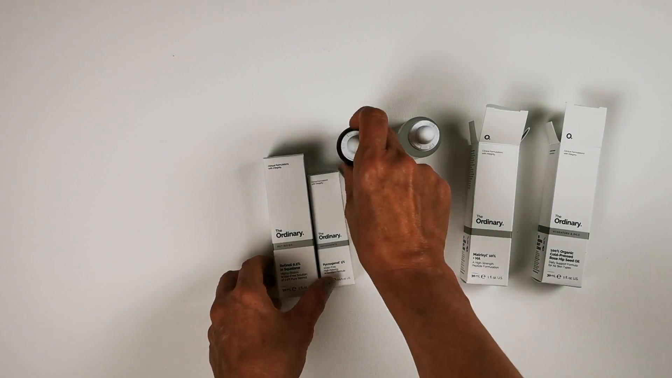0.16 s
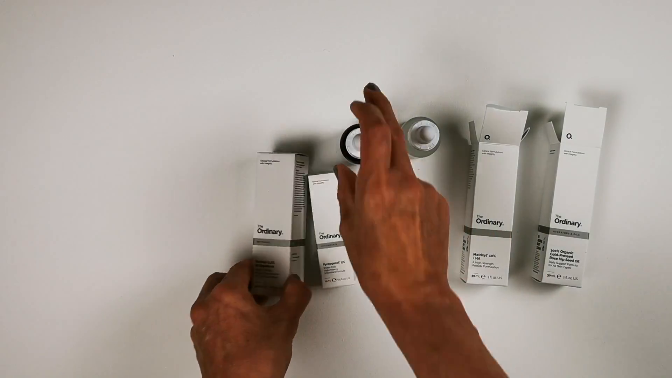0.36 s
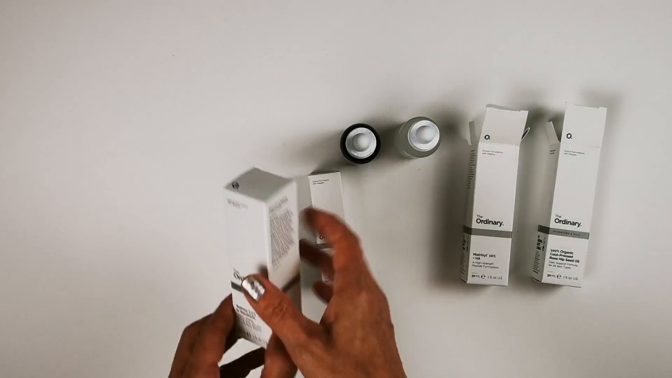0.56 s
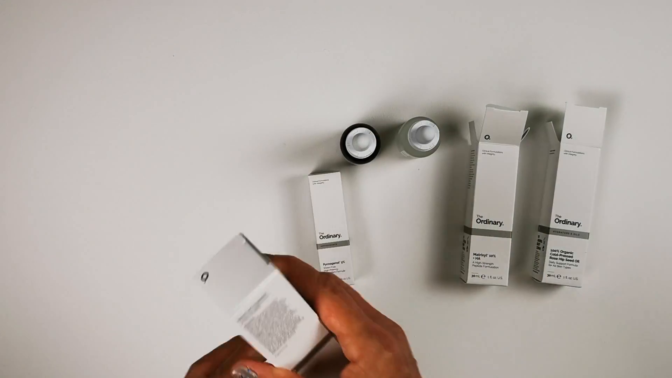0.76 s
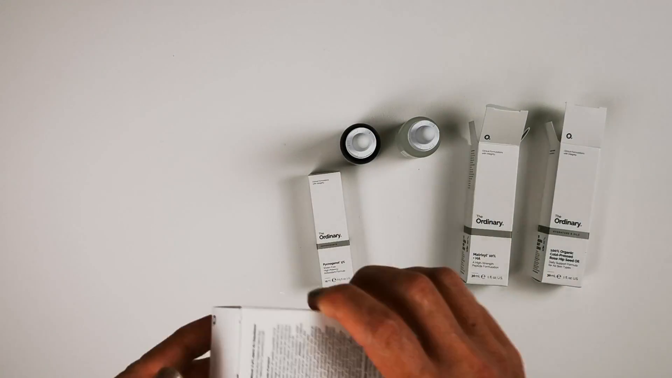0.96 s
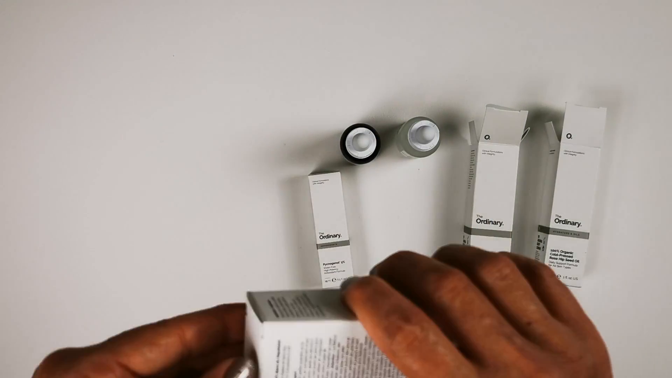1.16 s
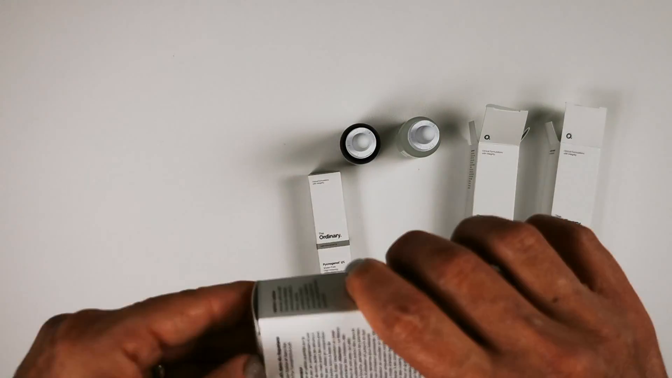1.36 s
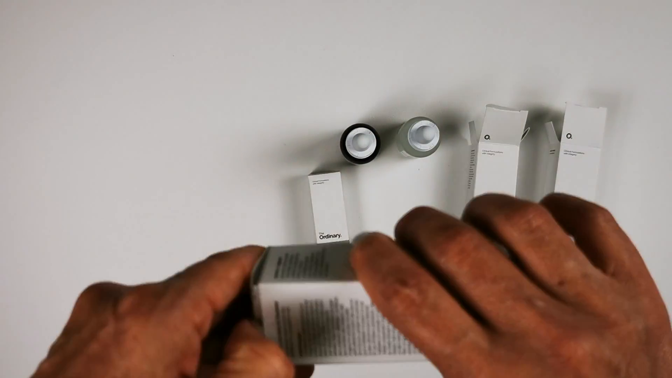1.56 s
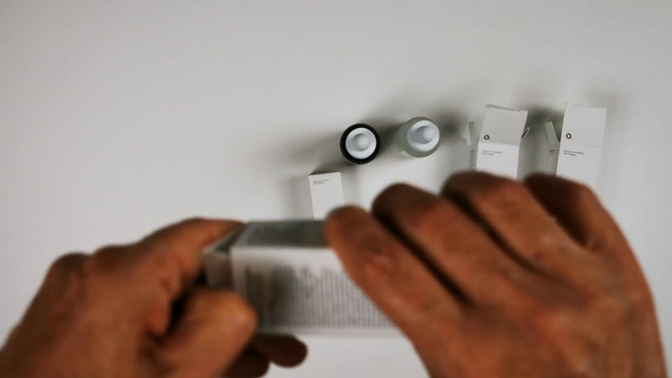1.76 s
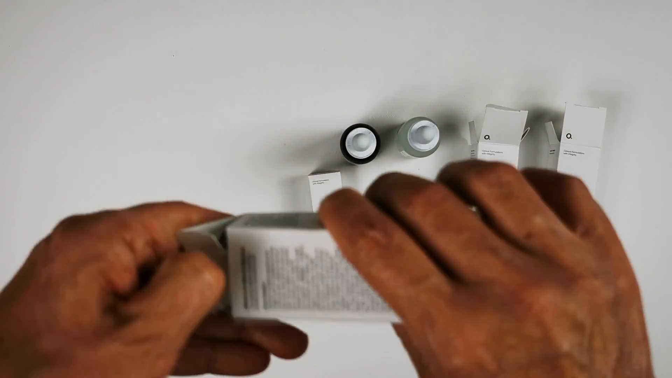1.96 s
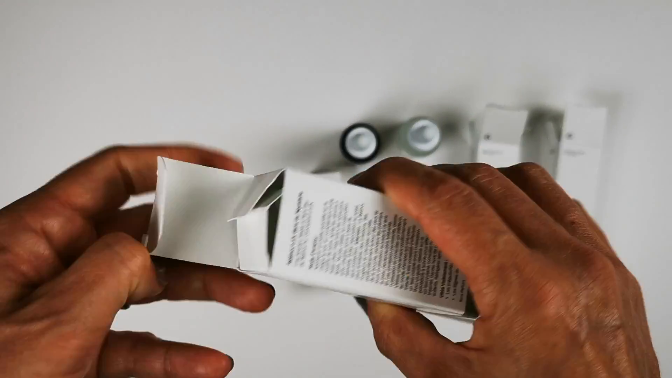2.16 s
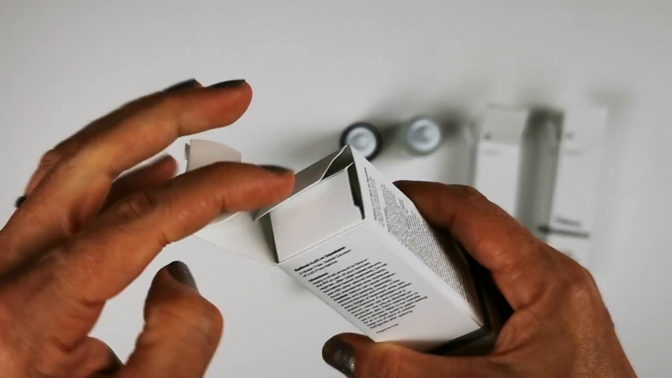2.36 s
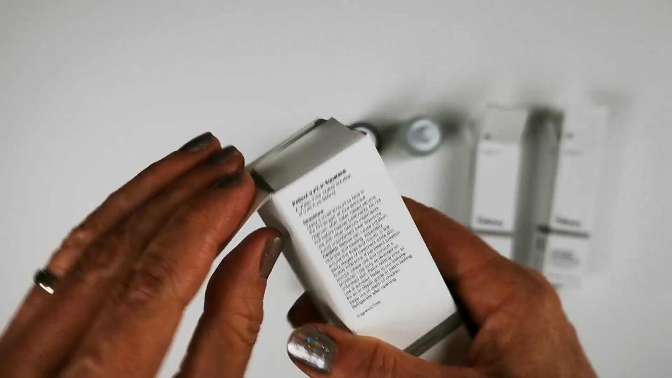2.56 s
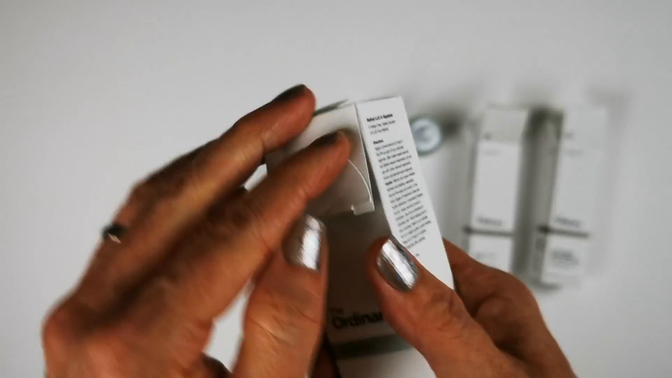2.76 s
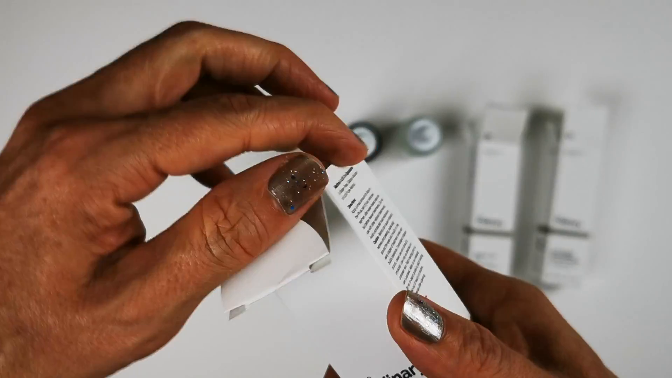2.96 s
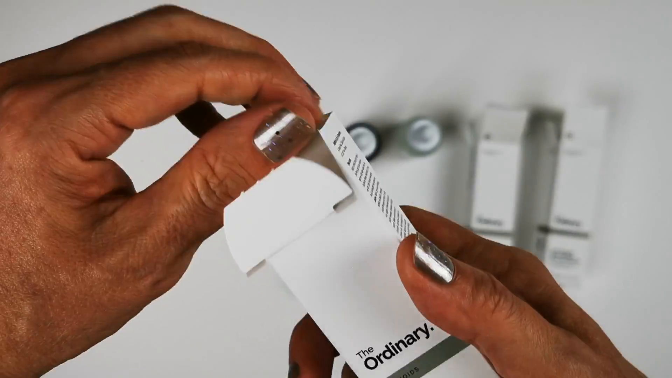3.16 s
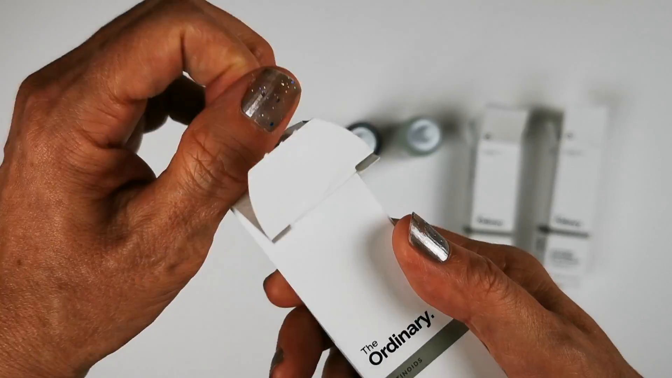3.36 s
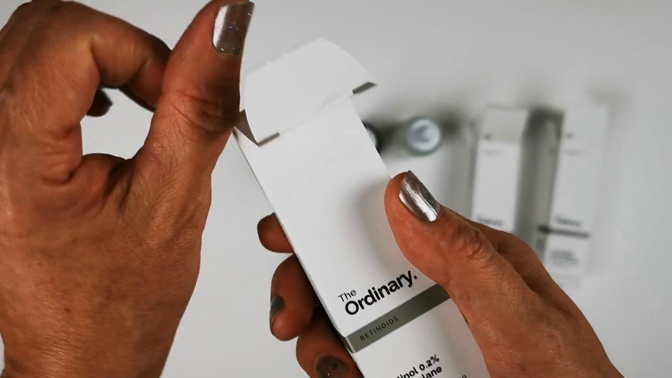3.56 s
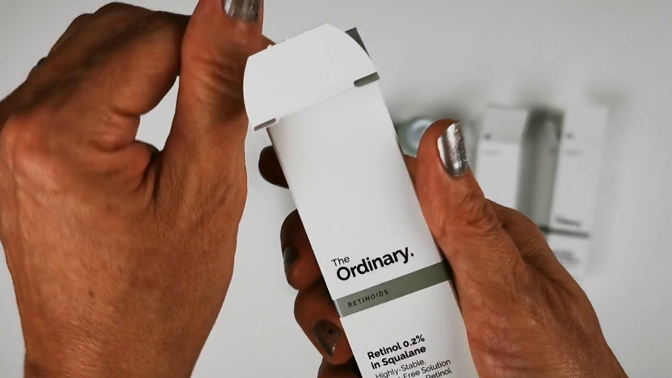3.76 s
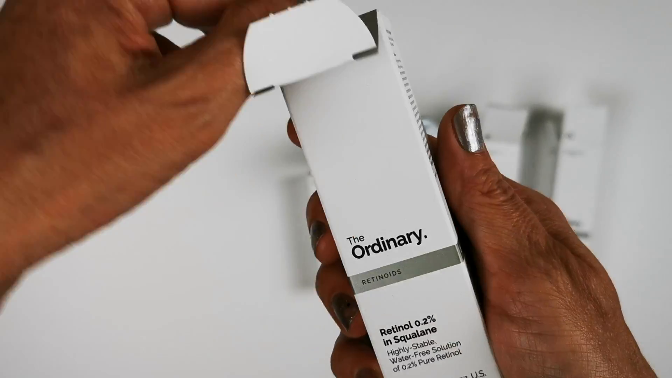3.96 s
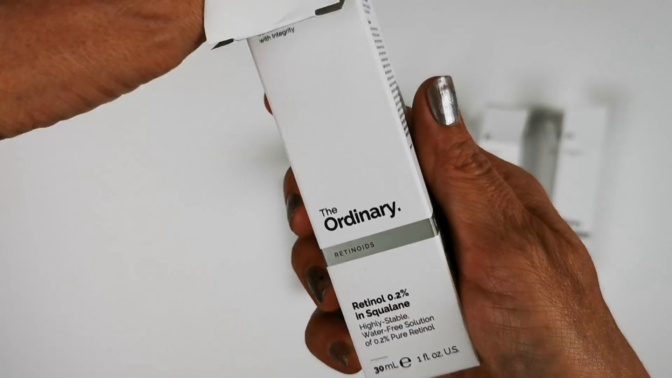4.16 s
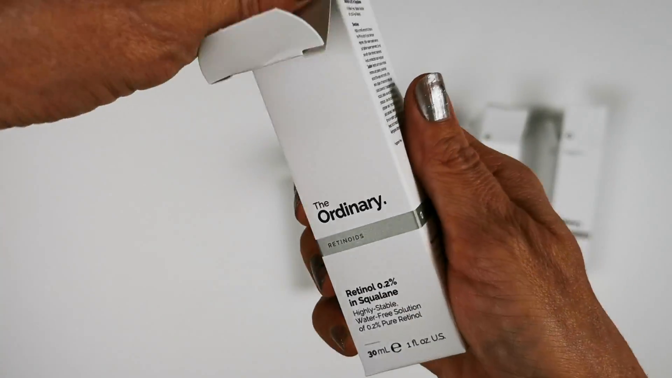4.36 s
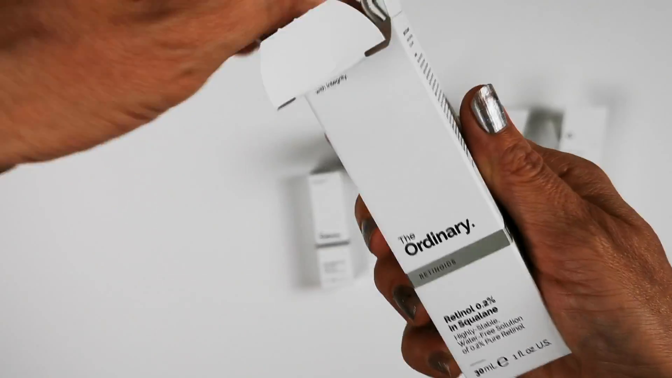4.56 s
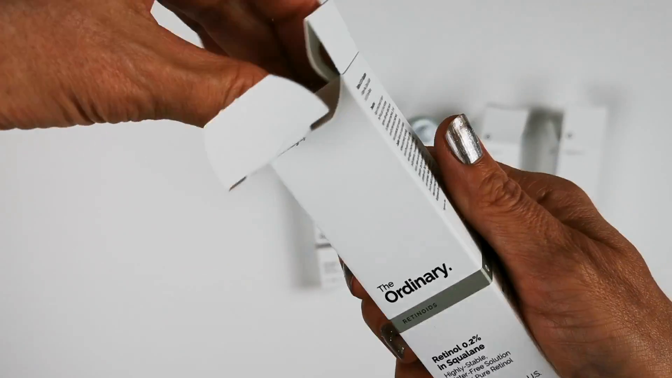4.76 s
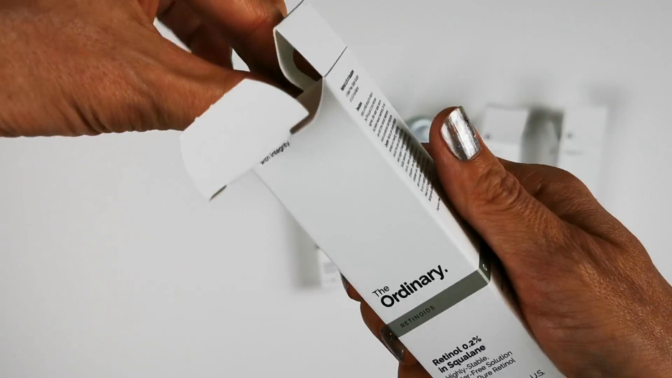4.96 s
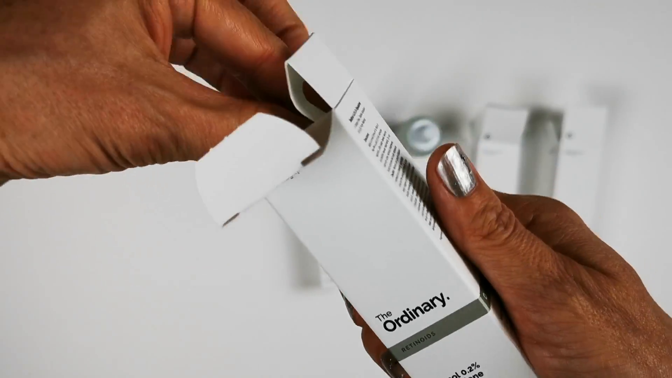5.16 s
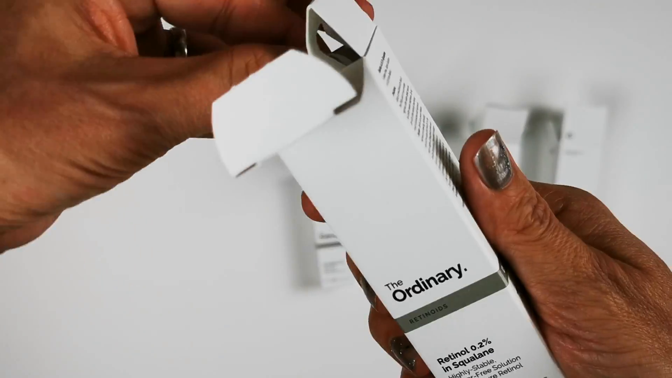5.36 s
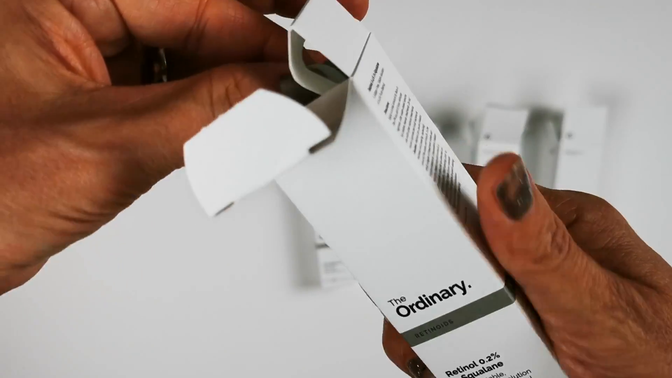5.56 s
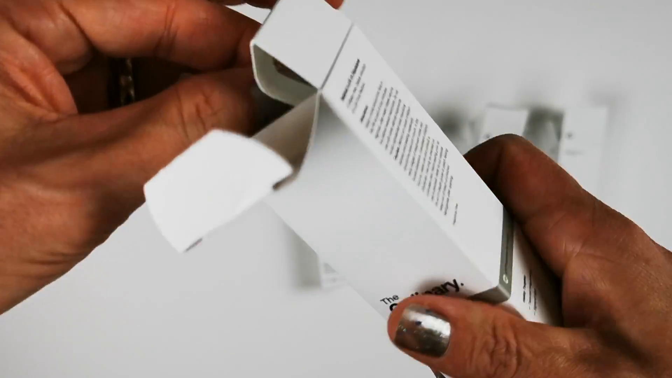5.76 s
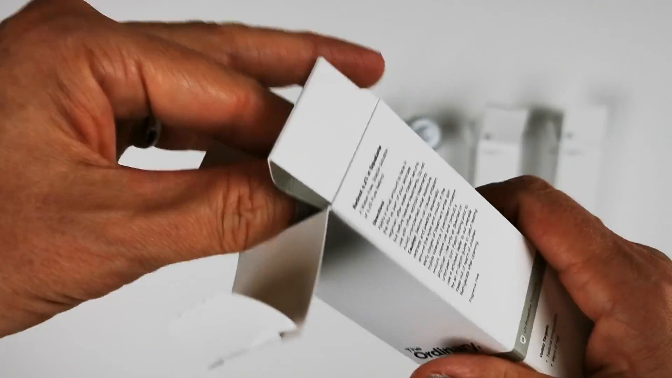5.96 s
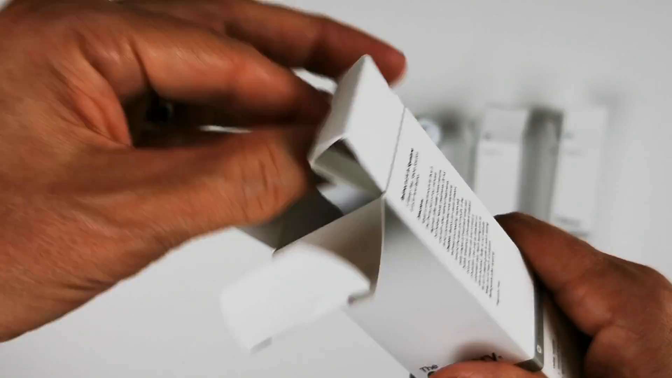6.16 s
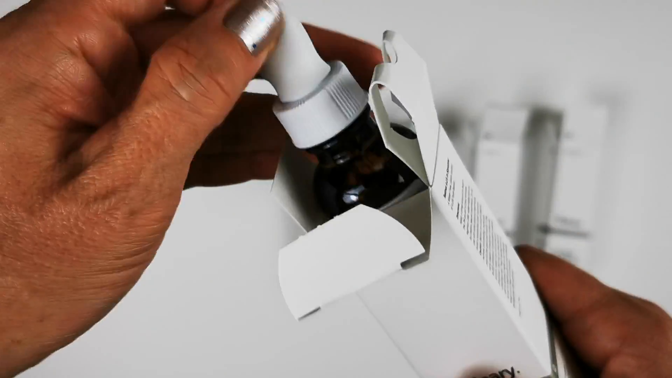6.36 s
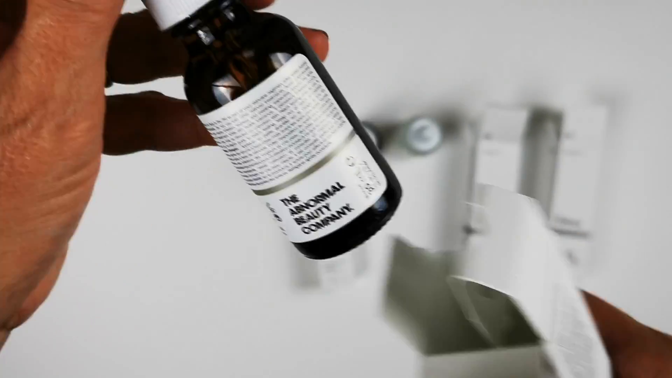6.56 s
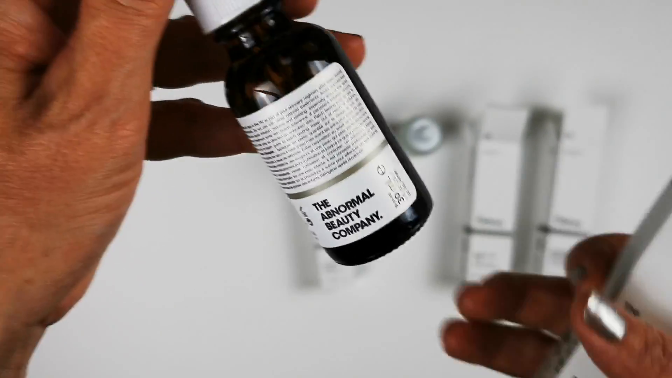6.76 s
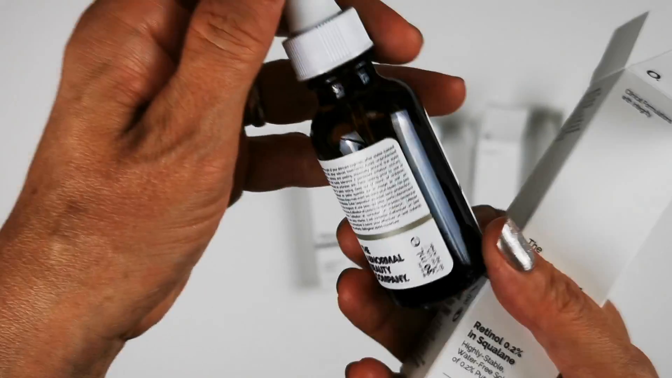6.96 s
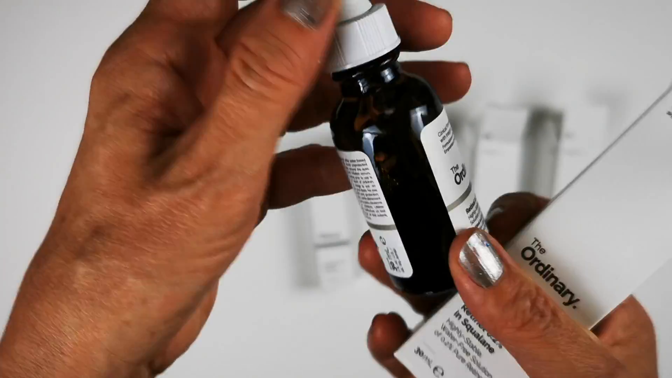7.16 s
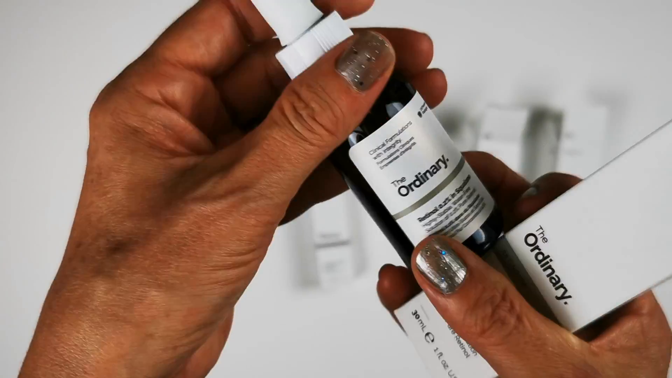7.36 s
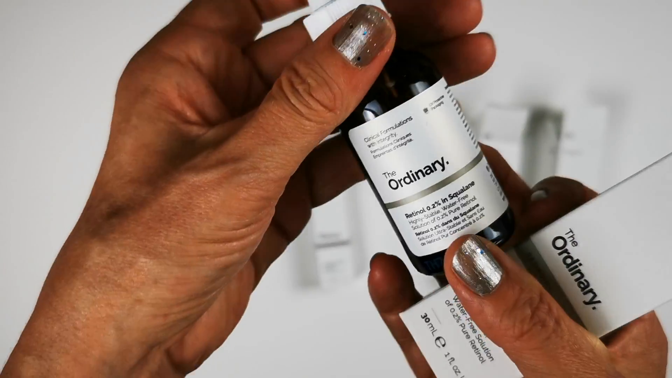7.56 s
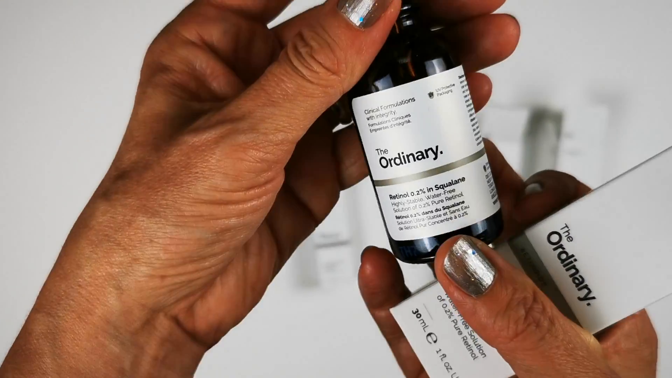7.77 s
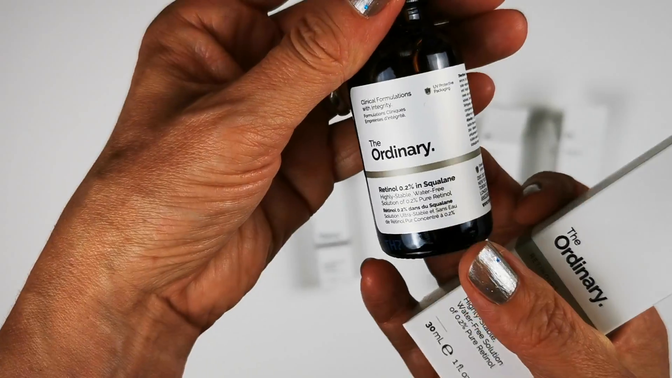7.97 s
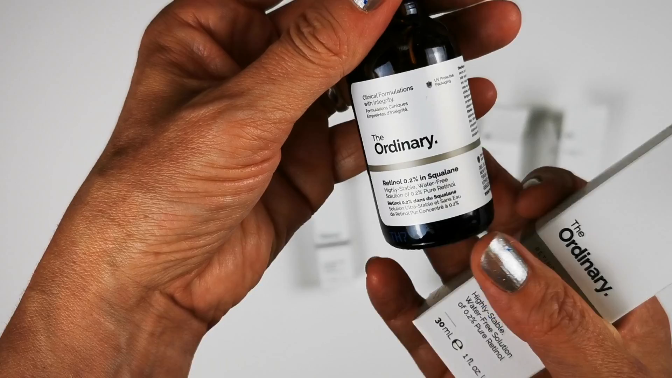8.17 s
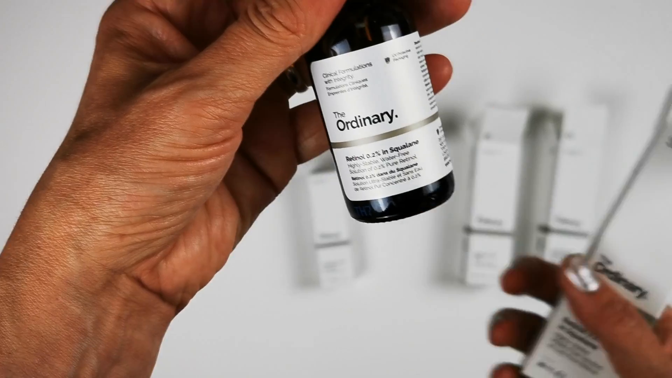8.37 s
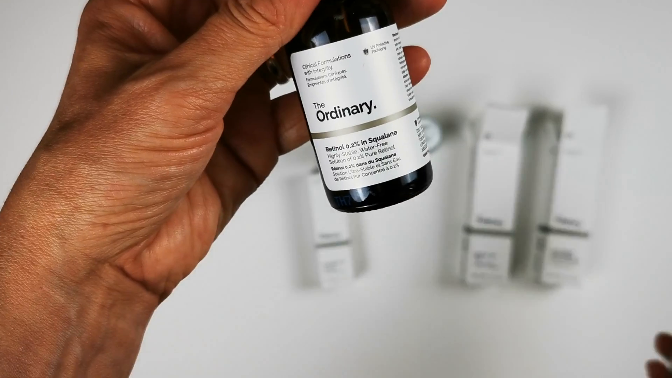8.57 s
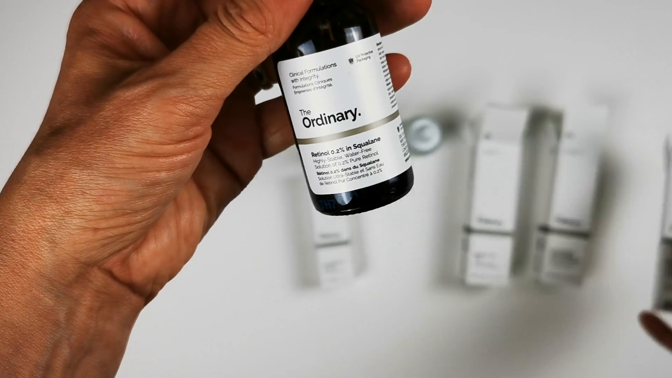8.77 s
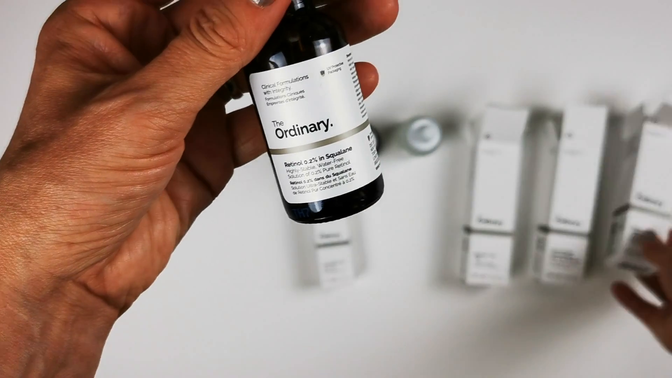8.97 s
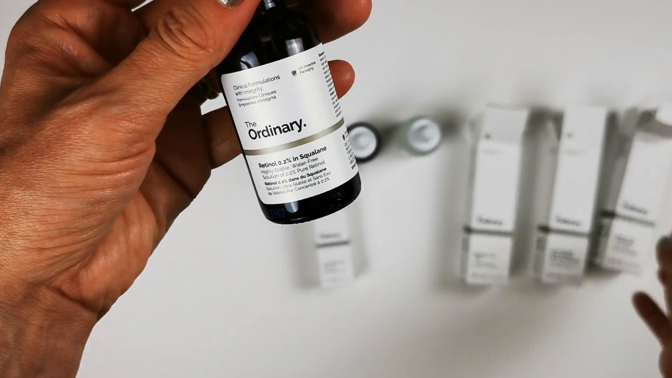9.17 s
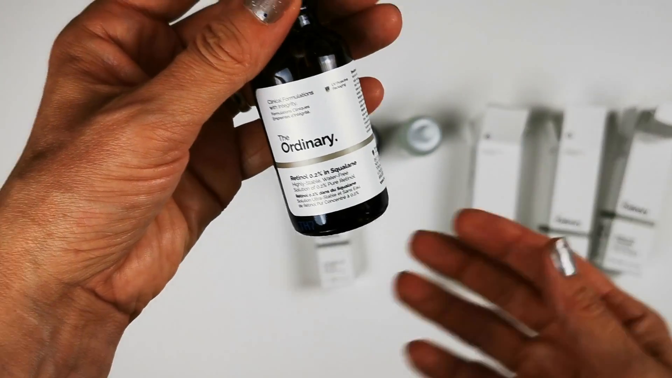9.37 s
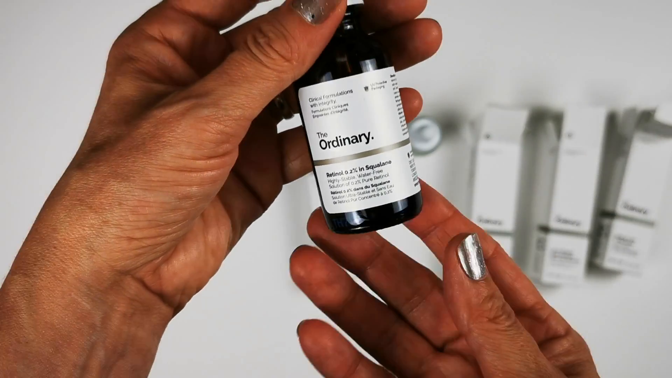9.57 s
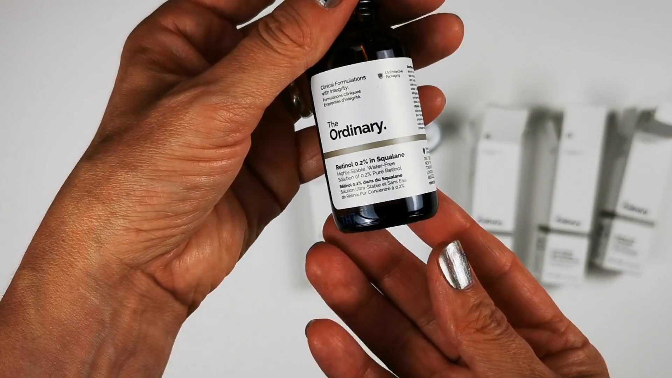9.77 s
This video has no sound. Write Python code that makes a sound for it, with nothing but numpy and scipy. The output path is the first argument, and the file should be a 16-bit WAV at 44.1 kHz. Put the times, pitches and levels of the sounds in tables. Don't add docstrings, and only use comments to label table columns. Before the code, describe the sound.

A small bottle touches a table with a soft thud, then fingers rub and snap a thin carton, loudest near two seconds. Smaller creases and ticks follow as the lid is worked open. Sharp pops and raspy scrapes mark the bottle being drawn out; light taps, near quiet, and a box set-down end it. Close stereo in a small room, faint low hum, hands mostly toward the right.

```python
import sys
import numpy as np
from scipy import signal
from scipy.fft import rfft, irfft, next_fast_len
from scipy.io import wavfile
from scipy.ndimage import uniform_filter1d, map_coordinates

SR = 44100
rng = np.random.default_rng(int(sys.argv[2]) if len(sys.argv) > 2 else 0)


def persist_wave(psi):
    counts = np.round(np.clip(psi, -1, 1) * 32767).astype(np.int16)
    wavfile.write(sys.argv[1], SR, np.atleast_2d(counts).T)


def boost_factor(decibels):
    exponent = np.asarray(decibels, float) / 20
    return 10 ** exponent


N = 432621


def rms_one(x):
    return x / np.sqrt(np.mean(x ** 2) + 1e-20)


def in_time(rows):
    s, *columns = np.transpose(rows)
    return [np.interp(np.arange(N) / SR, s, c) for c in columns]


def at_hz(points, hz):
    point_hz, value = np.transpose(points)
    return np.interp(np.log(hz + 1), np.log(point_hz), value)


def coloured(x, spectrum):
    length = x.shape[-1]
    size = next_fast_len(length + 512)
    gain = boost_factor(at_hz(spectrum, np.fft.rfftfreq(size, 1 / SR)))
    return irfft(rfft(x, size) * gain, size)[..., :length]


def resonate(x, hz, width_hz):
    r = np.exp(-np.pi * width_hz / SR)
    poles = [1, -2 * r * np.cos(2 * np.pi * hz / SR), r * r]
    return signal.lfilter([(1 - r * r) / 2, 0, (r * r - 1) / 2], poles, x)


def body(x, modes, shifts_db):
    out = 0
    for k, (hz, width_hz, db) in enumerate(modes):
        out = out + (-1) ** k * boost_factor(db + shifts_db[k]) * resonate(x, hz, width_hz)
    return out


def octaves_away(hz):
    return [np.abs(np.log2(hz / mode_hz)) for mode_hz, _, _ in CARTON]


def flutter(rate):
    r = np.exp(-32 * np.pi * rate / SR)
    slow = signal.lfilter([1], [1, -2 * r, r * r], rng.standard_normal(N // 16 + 3002))
    slow = rms_one(slow[3000:])
    return np.interp(np.arange(N) / 16, np.arange(len(slow)), slow)


def grains(per_s, spread_db):
    sizes = boost_factor(spread_db * np.minimum(rng.exponential(1, N), 4)) * rng.choice([-1, 1], N)
    return sizes * (rng.random(N) < per_s / SR)


# middle t/s, length/s, body level/dB, hiss level/dB, grip f/Hz
LID_RUBS = [(0.252, 0.4, -72, -86, 880), (0.415, 0.13, -70, -63.5, 1480), (1.112, 0.16, -66.5, -61, 1690),
            (0.815, 0.24, -72, -64, 1260), (1.272, 0.027, -51.5, -62.5, 1120),
            (1.832, 0.11, -48.5, -55, 1097), (1.97, 0.12, -48.5, -58, 1500),
            (2.06, 0.068, -41.5, -50, 1770), (2.236, 0.066, -46.5, -52.5, 2040),
            (2.694, 0.094, -51.5, -48, 1514), (2.91, 0.27, -68, -54, 1540),
            (3.134, 0.1, -61.5, -59.5, 1360), (3.35, 0.21, -57.5, -58, 1520),
            (3.763, 0.18, -55.5, -53, 1570), (3.96, 0.38, -59, -57.5, 1500),
            (4.08, 0.059, -55, -55.5, 1760), (4.174, 0.17, -63, -58, 1580), (4.326, 0.15, -76, -78, 1260),
            (4.492, .08, -75, -53, 1440), (4.542, 0.12, -57, -51.5, 2200), (4.626, 0.042, -46, -65, 1420),
            (4.719, 0.064, -52, -51.5, 1410), (4.848, 0.32, -57.5, -58.5, 1480)]
# t/s, length/s, body level/dB, hiss level/dB, grip f/Hz
DRAW_RUBS = [(5.285, 0.088, -51.5, -51.5, 1810), (5.325, 0.066, -55, -51.5, 1800),
             (5.713, .25, -64.5, -58.5, 1750), (5.823, 0.06, -52, -44, 1820),
             (5.865, 0.03, -38.5, -38.5, 1600), (5.913, 0.15, -53, -53.5, 1800),
             (6.056, 0.19, -59.5, -54, 1400), (6.243, 0.076, -37, -36, 1940),
             (6.292, 0.15, -49.5, -39, 1520), (6.483, 0.11, -55, -43.5, 1520),
             (6.562, 0.17, -47.5, -44, 1325), (6.628, 0.05, -46.5, -54, 1420),
             (6.68, 0.15, -61.5, -57, 1274), (8.33, 0.068, -76, -85, 1210), (8.413, 0.1, -67, -61.5, 1460),
             (8.49, 0.13, -72, -63.5, 1180), (8.677, 0.3, -73, -60, 2000), (9.102, 0.024, -53, -64, 710)]
# t/s, length/s, body level/dB, hiss level/dB, grip f/Hz
JERKS = [
    (0.699, 0.1, -63, -60, 1320),
    (8.995, 0.066, -37.5, -47, 1220),
]
# start t/s, length/s, body level/dB, hiss level/dB
HOLDS = [(0.748, 0.49, -85, -72.5), (2.28, 0.22, -67, -78), (2.56, 0.42, -69.5, -74),
         (3.182, 0.7, -76, -72), (4.284, 0.66, -68, -64.5), (4.902, 0.18, -75, -80),
         (5.358, 0.066, -67, -79), (5.536, 0.13, -69, -69), (8.39, 0.204, -81, -82),
         (8.6, 0.18, -85, -67.5), (8.924, 0.3, -82, -67.5), (0.604, .12, -81, -85)]


def strokes():
    roundness, hold_fade_db_per_s = 1.29, 500
    t, power = np.arange(0, N, 32) / SR, 1e-12
    for rows, share in (LID_RUBS + DRAW_RUBS, 0.52), (JERKS, 0.085):
        for s, length, body_db, hiss_db, _ in rows:
            off = np.maximum((s - t) / share, (t - s) / (1 - share)) / length
            power = power + boost_factor(np.array([[body_db], [hiss_db]]) - 20 * off ** roundness) ** 2
    for s, length, body_db, hiss_db in HOLDS:
        off = np.maximum(np.maximum(s - t, t - s - length), 0)
        power = power + boost_factor(np.array([[body_db], [hiss_db]]) - hold_fade_db_per_s * off) ** 2
    grip_hz, = in_time(sorted((row[0], row[-1]) for row in LID_RUBS + DRAW_RUBS + JERKS))
    body_db, hiss_db = in_time(np.c_[t, 10 * np.log10(power).T])
    return body_db, hiss_db, grip_hz


# f/Hz, width/Hz, level/dB
CARTON = [(585, 200, -10), (727, 54, -3), (826, 456, 0), (984, 597, -1), (1210, 270, -7.5),
          (1600, 130, -12.5), (1883, 900, -12.5), (2327, 370, -5.5), (2930, 390, -19)]
# f/Hz, level per Hz/dB
HISS = [(1470, -26.5), (2500, -3.5), (3900, -4.5), (5310, -0.5), (6010, -3.5), (7300, -1.5), (9960, -6.5),
        (12700, -6), (16000, -17.5)]


def rubbing():
    body_db, hiss_db, grip_hz = strokes()
    catch_db = flutter(rate=50)
    shifts_db = [-15.0 * away + 2 * flutter(rate=21) for away in octaves_away(grip_hz)]
    hollow = body(grains(per_s=3100, spread_db=2.5), CARTON, shifts_db)
    hollow = hollow / np.sqrt(uniform_filter1d(hollow ** 2, size=4410) + 1e-20)

    slips = grains(per_s=8200, spread_db=0.0)
    slips = slips + 1.8 * np.abs(slips) * rng.standard_normal((2, N))
    rasp = coloured(slips, HISS)
    edges, surface = np.geomspace(2400, 17000, num=6), 0
    for edge in zip(edges, edges[1:]):
        band = signal.sosfilt(signal.butter(1, edge, "band", fs=SR, output="sos"), rasp)
        surface = surface + band * boost_factor(2.6 * flutter(rate=9))
    hollow = hollow * boost_factor(body_db - 1 + 2.0 * catch_db)
    return hollow + rms_one(surface) * boost_factor(hiss_db - 1 + 1.4 * catch_db)


# t/s, peak level/dB, panel ring f/Hz, relative crack level/dB, crush/ms
POPS = [(2.054, -25, 600, -35, 4), (2.0545, -24, 5900, -30, 1), (2.045, -32, 6000, -30, .6),
        (6.288, -30, 750, -30, 5), (1.7175, -18, 2274, -11.5, 4), (1.718, -22.5, 900, -31, 7),
        (9.1095, -25, 2040, -21, 7), (8.989, -36, 2520, -10.5, 6), (2.052, -12.5, 1560, -18, 5.5),
        (2.055, -19, 1400, -8, 3.5), (5.856, -34, 1420, -3, 8.5), (5.867, -25, 1210, -15.5, 8.3),
        (5.896, -23, 1970, -41, 2.8), (6.234, -20.5, 1840, -21.5, 8.9), (6.24, -25.5, 2100, -18, 4),
        (6.247, -27, 1900, -9.5, 3), (6.285, -27, 2830, -0.5, 4), (6.29, -22, 906, -8.5, 3),
        (6.565, -25, 1210, -31, 5.7), (9.003, -30, 2390, -7.5, 4)]
# t/s, peak level/dB, panel ring f/Hz, relative crack level/dB, crush/ms
SET_DOWNS = [
    (0.044, -30, 600, -49, 2),
    (0.379, -43, 605, -34, 3.6),
    (8.988, -26.5, 895, -23, 5.1),
    (9.1088, -20, 720, -13.5, 4),
]
# t/s, peak level/dB, panel ring f/Hz, relative crack level/dB
BENDS = [
    (0.0145, -46, 1150, -32),
    (0.707, -44, 1070, -1.5),
    (4.536, -42, 600, -16),
    (5.242, -59, 1500, -10.5),
    (6.071, -49.5, 1840, -19),
]
# t/s, peak level/dB, panel ring f/Hz, relative crack level/dB
CREASES = [(1.104, -44, 1380, -41), (1.907, -55, 1350, -17), (2.231, -36, 1790, 2.5),
           (2.318, -40.5, 2760, -12), (2.584, -43.5, 1210, -13), (2.63, -51.5, 940, 4.5),
           (2.671, -47.5, 990, -12.5), (2.725, -45, 1390, 4.5), (4.571, -44.5, 1530, 3),
           (4.617, -48, 2760, -24), (4.63, -36, 1570, -9), (4.688, -45, 1230, -17), (4.872, -46, 1900, -15),
           (4.898, -39, 1580, -6.5), (5.408, -52, 1910, -4), (5.552, -52.5, 1830, -1.5),
           (5.877, -55, 1510, -29), (5.926, -43.5, 1700, -20), (6.556, -33, 1110, -17),
           (6.604, -39, 1200, 3.5), (8.255, -63.5, 1310, -12), (8.481, -47, 1080, -21)]
# t/s, peak level/dB, panel ring f/Hz, relative crack level/dB
TICKS = [(1.027, -50.5, 794, -30), (1.655, -53, 900, -10.5), (1.966, -42.5, 1200, -24.5),
         (2.559, -57.5, 2440, -10.5), (2.801, -49, 1530, -0.5), (3.138, -30.5, 6750, -22.5),
         (3.751, -42, 2040, -4.5), (3.769, -36, 1890, -11.5), (4.087, -47, 920, -36),
         (4.166, -36, 1210, -43), (4.297, -48, 1210, -15.5), (3.981, -52, 2330, -9),
         (4.06, -58, 1300, -0.5), (4.146, -50, 2020, -9), (4.815, -49, 1580, -12), (5.263, -47, 2980, -9),
         (5.32, -38, 1530, -9), (5.36, -49, 1240, 3), (5.387, -51.5, 1490, 2), (5.793, -43, 1860, -20),
         (6.399, -48, 1210, -23), (6.495, -42.5, 1090, -0.5), (3.639, -60.5, 1210, 3.5),
         (5.942, -46.5, 2300, -18), (5.977, -52, 500, -20)]
# t/s, peak level/dB, panel ring f/Hz, relative crack level/dB
TAPS = [(1.259, -41.5, 1470, -24), (4.375, -45, 1120, -22), (4.717, -33, 745, -8),
        (6.888, -43.5, 1170, -41), (6.932, -46.5, 1200, -25), (6.961, -59, 1150, -30),
        (7.103, -44, 1160, -25), (7.298, -52.5, 1160, -20.5), (7.41, -56.5, 1277, -20),
        (7.458, -45.5, 1140, -22.5), (7.466, -40.5, 1110, -19), (8.304, -50, 1210, -20.5)]


def contacts():
    out = []
    # kind, knock of the faces under the ring in dB, crush in ms
    for rows, knock_db, crush_ms in (BENDS, -10, 2.5), (CREASES, -20, 4.1), (TICKS, -30, 2.6), (TAPS, -19, 1.2):
        for s, peak_db, hz, crack_db in rows:
            out.append((s, peak_db, hz, knock_db, crack_db, crush_ms, False))
    for rows, knock_db in (POPS, -24), (SET_DOWNS, -18.5):
        for s, peak_db, hz, crack_db, crush_ms in rows:
            out.append((s, peak_db, hz, knock_db, crack_db, crush_ms, True))
    return out


# f/Hz, width/Hz, level/dB
KNOCK = [(204, 78, 2.5), (309, 72, 8.5), (483, 350, -1)]


def snaps():
    size = 4096
    t, out = np.arange(size) / SR, np.zeros((2, N + size))
    crack_filter = signal.butter(2, 2600, "high", fs=SR, output="sos")
    for s, peak_db, ring_hz, knock_db, crack_db, crush_ms, hard in contacts():
        release, width_hz, contact_s = (5, 390, 0.0002) if hard else (3, 0.14 * ring_hz, 0.0004)
        force = np.exp(-t / (crush_ms / 1000)) + 0.035 * np.exp(-t / 0.046)
        fibres = rng.standard_normal(size) * force
        crush = fibres - release * np.sin(np.pi * np.minimum(t / contact_s, 1)) ** 2

        away = np.array(octaves_away(ring_hz))
        ring = body(crush, CARTON, -6.0 * away) + 1.5 * resonate(crush, ring_hz, width_hz)
        if not hard:
            ring *= 1 - np.exp(-t / 0.001)
        knock = body(crush, KNOCK, np.zeros(len(KNOCK)))
        spread = 0.2 * crush + fibres + 1.9 * force * rng.standard_normal((2, size))
        crack = signal.sosfilt(crack_filter, coloured(spread, HISS))

        start = round(s * SR)
        for part, db in (ring, 0), (knock, knock_db + 1.5), (crack, crack_db + 8.0):
            out[:, start:start + size] += boost_factor(peak_db + db) * part / np.abs(part).max()
    return out[:, :N]


# middle t/s, length/s, level/dB, f/Hz
SKIMS = [(1.82, .04, -52, 900), (2.042, .01, -44, 1750), (.08, 0.068, -58.5, 900), (.225, .05, -60.5, 600),
         (1.74, .04, -47, 2400), (1.735, .03, -47, 1500), (0.341, 0.046, -75, 1150),
         (.72, 0.037, -56.5, 5100), (1.063, .16, -72, 4550), (1.706, .015, -69, 900),
         (1.834, .07, -62, 6000), (1.972, 0.08, -56, 6100), (2.68, .04, -64, 990),
         (2.827, 0.076, -73, 1500), (2.891, 0.089, -61, 1420), (2.901, .14, -56, 7100),
         (3.129, .08, -58, 6750), (3.31, 0.07, -59, 6800), (3.339, 0.11, -64, 4430), (3.38, .04, -62, 1400),
         (3.45, 0.051, -65.5, 1280), (3.688, 0.059, -72, 2040), (3.774, 0.11, -62, 8600),
         (3.795, 0.026, -56.5, 1204), (3.947, .12, -66, 1180), (4.215, 0.03, -62.5, 6200),
         (4.328, 0.073, -61, 1240), (4.431, 0.07, -63.5, 6500), (4.48, 0.022, -63, 880),
         (4.55, 0.059, -56, 7600), (5.279, .05, -53.5, 3030), (5.296, 0.025, -48.5, 1390),
         (5.546, 0.055, -68, 1200), (5.606, 0.023, -71, 1750), (5.633, .04, -65, 1820),
         (5.625, 0.044, -64, 8500), (5.708, .06, -66, 1920), (5.875, 0.012, -48, 1170),
         (6.007, .04, -56, 1710), (6.059, 0.057, -54, 4030), (6.253, 0.01, -51, 7000),
         (6.478, .05, -50.5, 9000), (6.508, .05, -51.5, 1140), (6.58, .025, -40.5, 1190),
         (6.608, 0.022, -51, 9400), (6.63, 0.018, -46, 1180), (6.686, 0.027, -63, 2170),
         (6.854, 0.032, -72, 1250), (9.024, 0.037, -50.5, 1108), (9.136, .07, -45.5, 790),
         (8.41, .07, -68, 1330),
    (8.43, .05, -70, 2750),
    (8.54, .09, -72, 1250),
    (8.68, .13, -66, 1050),
    (8.77, .08, -73, 1300),
    (8.935, .02, -66, 500),
]


def skims():
    out = np.zeros(N)
    for s, length, db, hz in SKIMS:
        size = min(round(length * 1.5 * SR), 8192)
        chance = rng.standard_normal((2, size))
        slips = chance[0] * (0.4 + np.abs(chance[1]))
        width_hz = 0.22 * hz * (hz / 3000) ** 0.35
        band = resonate(resonate(slips, hz, width_hz), hz, 2 * width_hz)
        start = round(s * SR) - size // 2
        out[start:start + size] += boost_factor(db) * rms_one(band) * np.hanning(size)
    return out


# t/s, peak level/dB
THUDS = [(0.0425, -27.5), (0.199, -47), (0.209, -38), (0.22, -41), (0.235, -42), (0.25, -48), (0.38, -31),
         (2.053, -38), (6.29, -45), (6.565, -46), (8.987, -43), (9.106, -38.5)]
# f/Hz, level/dB, t60/s
TABLE = [(105, -17, 0.028), (138, 3.5, 0.076), (171, 2.5, 0.027), (220, -21.5, 0.071), (255, 3, 0.039),
         (340, -2, .07), (449, -9.5, 0.079), (569.4, -16.5, 0.073)]


def thuds():
    s, peak_db = np.transpose(THUDS)
    out, at = np.zeros(N), np.round(s * SR).astype(int)
    for hz, level_db, t60 in TABLE:
        clicks = np.zeros(N) + 1e-18
        clicks[at] = -boost_factor(peak_db + level_db - 13.5 + rng.normal(0, 2.4, len(at)))
        rocking = signal.lfilter([1], [1, -np.exp(-1 / (0.017 * SR))], clicks) * rng.standard_normal(N)
        r, w = boost_factor(-60 / (t60 * SR)), 2 * np.pi * hz / SR
        out += signal.lfilter([0, np.sin(w)], [1, -2 * r * np.cos(w), r * r], clicks + 0.076 * rocking)
    push = np.zeros(N) + 1e-18
    push[at] = -boost_factor(peak_db + 41.5)
    out += resonate(uniform_filter1d(push, size=25, origin=12), hz=205, width_hz=67)
    return signal.sosfilt(signal.butter(2, 70, "high", fs=SR, output="sos"), out)


def placed(x, pan_db):
    low = signal.sosfilt(signal.butter(1, 300, fs=SR, output="sos"), x)
    top = signal.sosfilt(signal.butter(1, 4000, "high", fs=SR, output="sos"), x)
    sides = np.array([[0.5], [-0.5]]) * pan_db
    return low + (x - low - top) * boost_factor(sides) + top * boost_factor(0.69 * sides)


# f/Hz, t60/s
ROOM = [(100, .35), (500, .28), (900, .23), (5000, .22), (14000, .16)]


def room(x):
    t, tail = np.arange(SR // 2) / SR, 0
    edges = 60 * 2 ** np.arange(0, 8.5)
    for low, high in zip(edges, edges[1:]):
        noise = rng.standard_normal((2, len(t)))
        if low < 200:
            noise[1] = noise[0]
        band = signal.sosfilt(signal.butter(2, [low, high], "band", fs=SR, output="sos"), noise)
        tail = tail + band * boost_factor(-60 * t / at_hz(ROOM, np.sqrt(low * high)))
    tail = tail * (1 - np.exp(-t / 0.00053))
    tail = signal.sosfilt(signal.butter(1, 160, "high", fs=SR, output="sos"), tail)
    return signal.fftconvolve(x[None], tail, axes=1)[:, :N] / 8


# f/Hz, level per Hz/dB
FLOOR = [(12, -39.5), (20, -7), (32, -9), (96, -14.5), (134, -23), (172, -24), (248, -27), (285, -24.5),
         (399, -26), (1300, -33.5), (4180, -38.5), (7730, -44), (10800, -39), (16000, -41.5)]
# f/Hz, likeness/0..1
LIKENESS = [(25, .75), (60, 0.8), (240, 0.6), (950, 0.34), (3770, 0.27), (15000, 0)]
# f/Hz, level/dB
HUM = [(90, -74.5)]


def background():
    size = next_fast_len(N)
    hz = np.fft.rfftfreq(size, 1 / SR)
    alike = at_hz(LIKENESS, hz)
    mid, side = rfft(rng.standard_normal((2, size))) * boost_factor(at_hz(FLOOR, hz))
    ports = np.sqrt(1 + alike) * mid + np.sqrt(1 - alike) * side * [[1], [-1]]
    out = boost_factor(-68.5) * rms_one(irfft(ports, size)[:, :N])
    for hum_hz, db in HUM:
        turns = np.cumsum(hum_hz + 7.0 * flutter(rate=12)) / SR
        out = out + boost_factor(db + 1.0 + 0.79 * flutter(rate=3)) * np.sin(2 * np.pi * turns)
    return out


# t/s, left minus right level/dB, left port lateness/samples
PLACE = [(0, -2, -4.5), (1.4, -11.5, -1), (1.7, -9, -7), (3.5, -5.5, -2.5), (4.7, -7, 0.5),
         (5.5, -6.5, -2.5), (6.3, -7, -5.5), (7.2, -10, 2.5), (8.3, -10, 0.5), (8.9, -12, 10.5),
         (9.81, -12.5, -7.5)]


def scene():
    pan_db, left_late = in_time(PLACE)
    hands = rubbing() + snaps() + skims() + thuds()
    near = placed(hands, pan_db)
    near[0] = map_coordinates(near[0], [np.arange(N) - left_late], order=3)
    answer = placed(room(hands.mean(axis=0)), 0.5 * pan_db)
    return near + boost_factor(-15.0) * answer + background()


def low_pass(x):
    return signal.sosfilt(signal.butter(12, 17050, fs=SR, output="sos"), x)


def record(dry):
    return low_pass(dry)


dry = scene()
out = record(dry)
persist_wave(out)
```